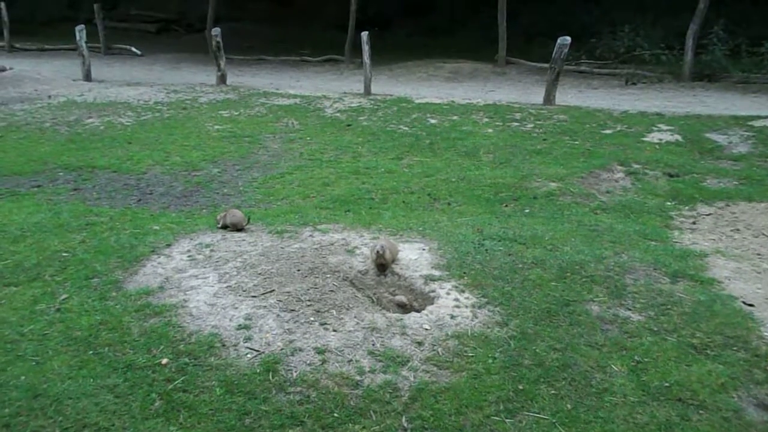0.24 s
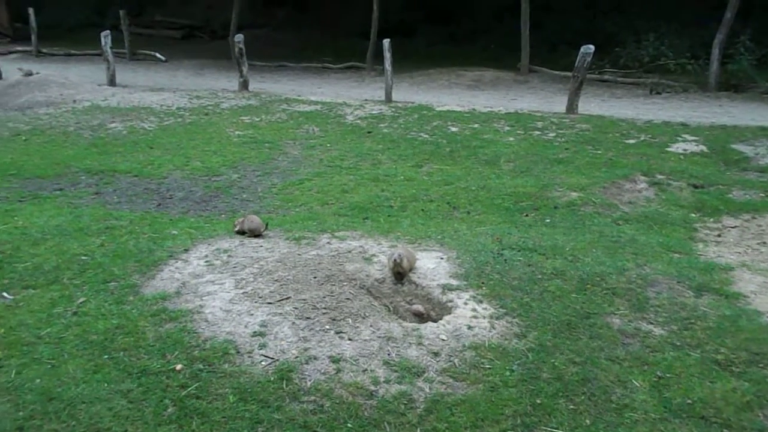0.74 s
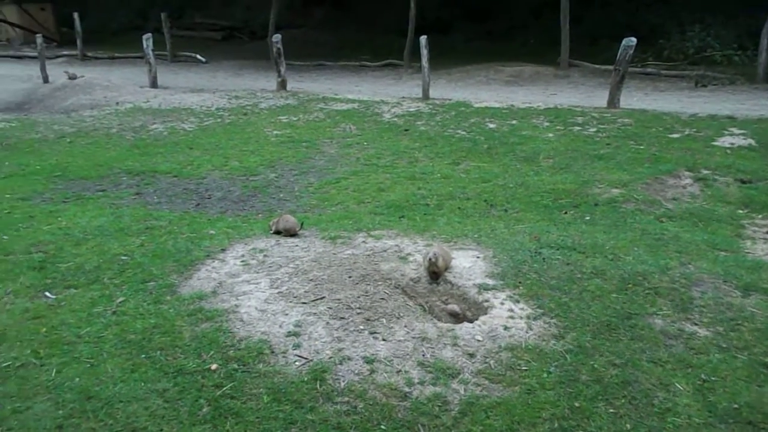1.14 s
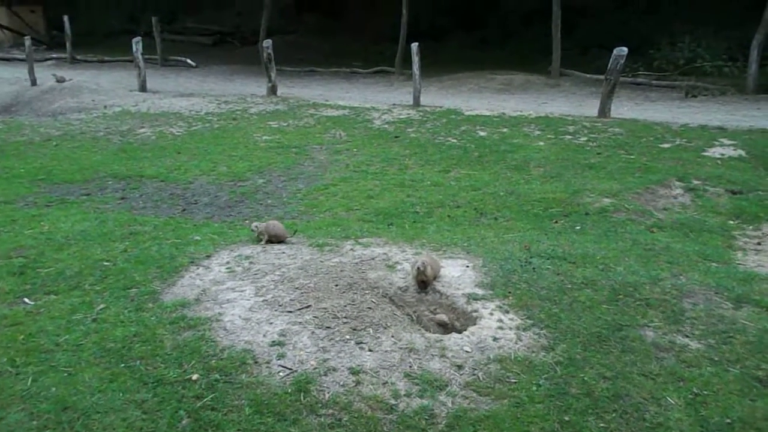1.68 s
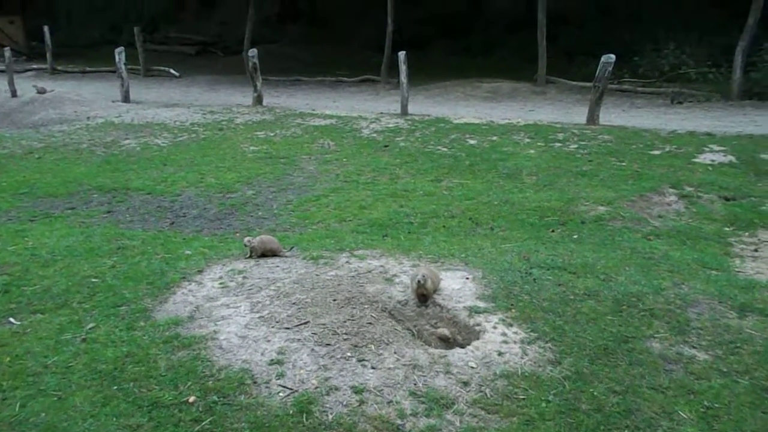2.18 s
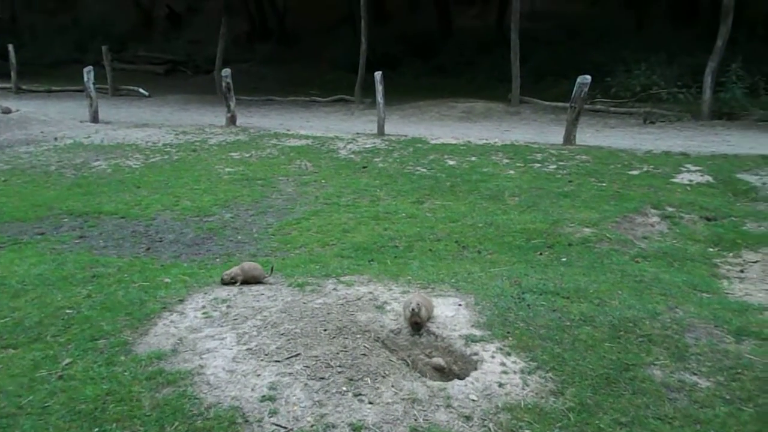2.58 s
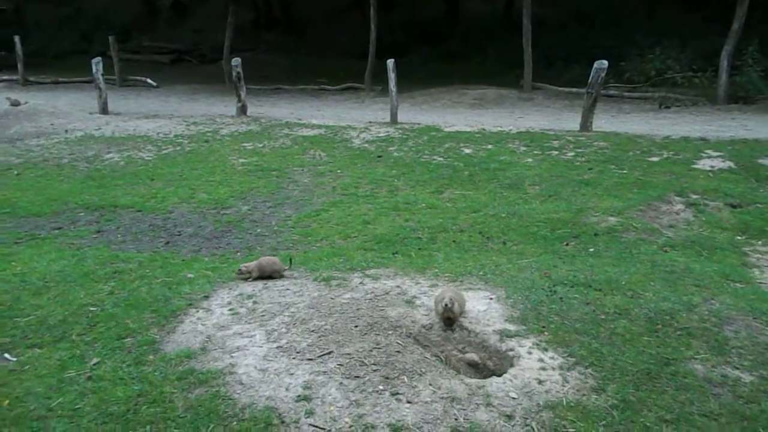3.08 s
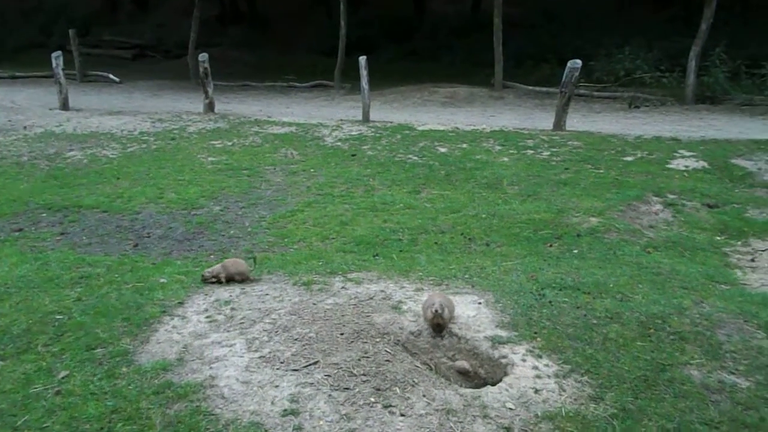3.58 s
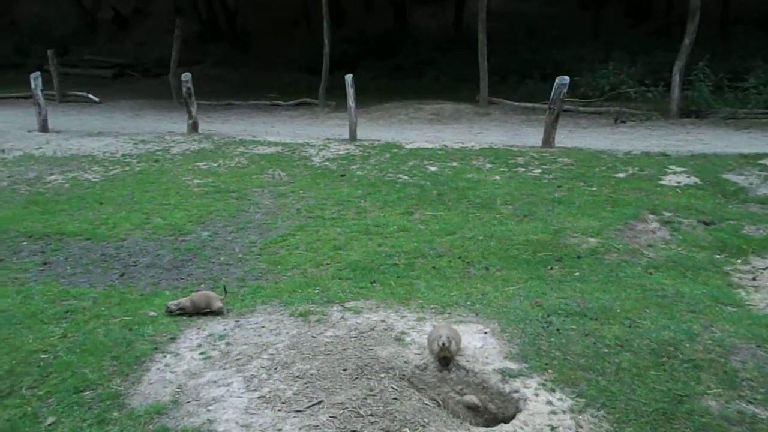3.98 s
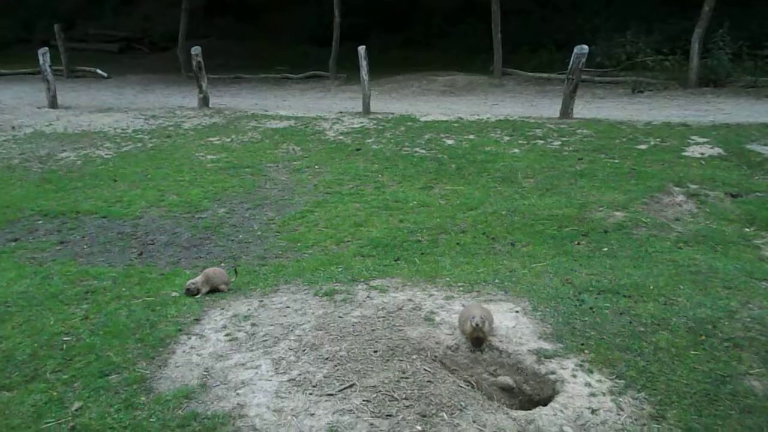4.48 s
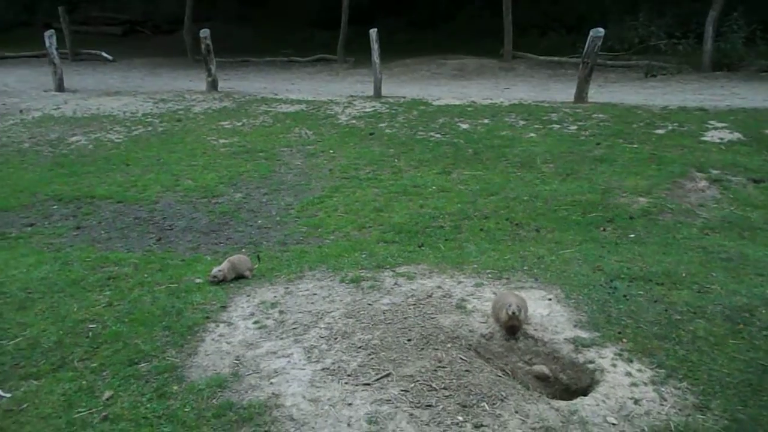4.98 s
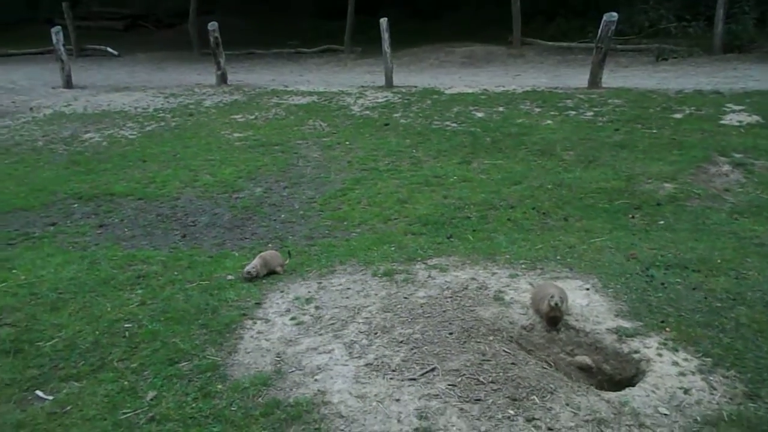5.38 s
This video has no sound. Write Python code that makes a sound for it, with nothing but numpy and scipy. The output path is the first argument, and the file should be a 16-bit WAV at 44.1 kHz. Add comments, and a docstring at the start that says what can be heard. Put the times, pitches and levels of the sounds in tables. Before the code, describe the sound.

A soft hiss of leaves and a low rumble of distant traffic run throughout, in an outdoor enclosure ringed by trees. At the very start, the faint echo of an earlier bark dies away. A prairie dog barks at about 0.8, 1.8 and 3.5 seconds. Each bark is a very short, high, two-part squeal that stands well above the background and leaves a light echo. Fingers knock and tick on the camera right at the microphone, hardest between 1 and 1.3 seconds, then lighter and scattered until near the end. From about 2.9 seconds a distant finch sings a faint run of falling chips, moving into slightly louder chips and hooked whistles around 4 seconds and ending in a falling buzz at about 5 seconds. A sleeve brushes very softly twice near 4.5 seconds.

```python
"""A grass enclosure ringed by trees. Distant traffic rumbles under the hiss of leaves and microphone,
and the trees still echo a prairie dog's earlier bark. It barks at 0.8, 1.8 and 3.5 s, each a two-part
squeal of the vocal folds near 1.8 kHz. Right at the microphone, fingers knock and tick on the camera,
hardest just after the first bark. From 2.9 s a far finch whistles a run of chips, then chips and hooks;
a sleeve brushes close by, and the finch ends on a falling buzz at 5 s."""
import sys
import numpy as np
from scipy import signal
from scipy.fft import rfft, irfft, next_fast_len
from scipy.io import wavfile
from scipy.ndimage import uniform_filter1d, map_coordinates

SR = 44100
rng = np.random.default_rng(int(sys.argv[2]) if len(sys.argv) > 2 else 0)


def dump(signal):
    """Clip the signal to [-1, 1] and save it as 16-bit WAV at the path in sys.argv[1]."""
    limited = np.clip(np.atleast_2d(signal).T, -1, 1)
    pcm = np.round(limited * 32767).astype(np.int16)
    wavfile.write(sys.argv[1], SR, pcm)


N = 248327
LEAD = SR // 2  # samples played before time zero

# distant traffic, swelling and easing: t/s, level/dB
TRAFFIC_LEVEL = [(0, -61.5), (.7, -61.5), (1.1, -60), (1.5, -62.5), (1.9, -60), (2.8, -61.5), (3.1, -59),
                 (3.4, -62), (4.4, -60), (5.1, -62.5), (5.63, -60)]
# spectra of the traffic and of the leaf and microphone hiss: f/Hz, relative level/dB
TRAFFIC_SPECTRUM = [(15, -20), (30, -6), (60, -2), (120, -1.5), (200, -2), (310, -1.5), (500, -5),
                    (900, -14), (1600, -26), (3000, -72)]
HISS_SPECTRUM = [(150, -48), (350, -11), (650, 0), (1100, 0.5), (2000, -1.5), (4000, -1), (6200, 3.5),
                 (7700, -2.5), (9800, 1), (13000, -6)]
# echo of the ring of trees: f/Hz, time to fall 60 dB/s
TREE_DECAY = [(1500, 1.4), (3500, 1.06), (5500, 0.89), (8000, 0.8), (11000, 0.57)]
# trunks and leaves return the treble best: f/Hz, gain/dB
TREE_SCATTER = [(1000, -7), (1800, -6.5), (3500, 0), (5500, -1.5), (9000, -0.5)]
# finch chips, falling: t/s, starting f/Hz, fall/Hz, relative level/dB
FINCH_CHIPS = [(.525, 5900, 695, -58.5), (2.853, 6200, 1100, -61), (2.937, 5600, 640, -64),
               (3.02, 5560, 680, -61), (3.103, 5300, 644, -59), (3.2, 4580, 500, -60),
               (3.286, 4450, 820, -55), (3.371, 4300, 810, -53), (3.453, 4300, 890, -53),
               (3.873, 4300, 1090, -60), (3.949, 4360, 1450, -49.5), (4.03, 4370, 1390, -49),
               (4.151, 4510, 1410, -49.5), (4.276, 4500, 1396, -50.5), (4.404, 4720, 1640, -48),
               (4.53, 4580, 1450, -50), (4.66, 4590, 1750, -52)]
# finch hooks, down then up: lowest point t/s, fall/s, rise/s, relative level/dB
FINCH_HOOKS = [(4.12, .03, .006, -56), (4.247, .036, .015, -55.5), (4.372, .034, .017, -56),
               (4.502, .04, .014, -55), (4.626, .029, .018, -56)]
# finch buzz, lower voice: t/s, f/Hz, relative level/dB, stroke rate/Hz
BUZZ_LOWER = [(4.9, 4840, -80, 182), (4.935, 4330, -54, 168), (5.01, 3700, -54, 92), (5.05, 3084, -53, 70),
              (5.12, 2600, -54.5, 66), (5.175, 2286, -69, 58)]
# finch buzz, upper voice: t/s, f/Hz, relative level/dB
BUZZ_UPPER = [(4.9, 5210, -67), (4.912, 5140, -50), (4.96, 4450, -57), (5.01, 4660, -45), (5.06, 5000, -66),
              (5.1, 5000, -76)]
# a sleeve beside the microphone: t/s, level/dB
SLEEVE_BRUSHES = [(4.465, -59), (4.56, -59.5)]
# fingers on the camera, dull knocks and sharp ticks: t/s, relative level/dB, f/Hz
FINGER_KNOCKS = [(.972, -30.5, 760), (1.026, -30, 704), (1.077, -39, 800), (1.092, -31.5, 830),
                 (1.281, -30.5, 650), (1.787, -32.5, 456), (2.795, -38, 470), (3.106, -39.5, 1100),
                 (4.07, -36, 385), (4.616, -53, 200), (5.275, -43.5, 286), (5.364, -44.5, 366),
                 (5.416, -40.5, 298)]
FINGER_TICKS = [(.558, -46, 5840), (.695, -46, 6070), (1.0406, -33, 9250), (1.078, -26, 8950),
                (1.0936, -14.5, 5300), (1.282, -36, 5866), (1.3138, -35, 5700), (1.6512, -36, 6700),
                (2.3042, -45, 7530), (2.818, -43, 8240)]
# prairie dog's throat, mouth narrow and mouth wide: f/Hz, gain/dB
THROAT_NARROW = [(1400, -34), (1900, -8), (3000, -11.5), (3800, -2), (5700, -3), (7600, -18), (9500, -23.5),
                 (11400, -37)]
THROAT_WIDE = [(1400, -21), (1750, -2), (3000, 12.5), (3500, -1.5), (5250, -0.5), (7000, 0.5), (8800, -14),
               (10500, -30)]
# barks at the vocal folds: t/s, attack/s, upward scoop/Hz;
# high first part: length/s, f/Hz, level/dB, flutter/0-1; break, below the second part: sag/Hz, dip/dB;
# lower second part: length/s, f/Hz, level/dB, flutter/0-1
BARK_CALLS = [(0.84, 0.0041, 50, .019, 1931, -15, 0.2, 88.6, 6.5, .04, 1770, -19.5, 0.2),
              (1.7885, 0.0062, 40, 0.015, 1893, -13.5, 0.34, 115, 9, .03, 1774, -19, 0.08),
              (3.5365, .008, 380, 0.01396, 1900, -15.5, 0.25, 24.5, 2, .037, 1813, -16.5, 0.17)]
# microphone response: f/Hz, gain/dB
MIC_RESPONSE = [(20, -10.5), (150, 0), (400, 1), (9800, 1), (10800, -3), (11600, -11), (12400, -22)]


def amp(db):
    return 10 ** (np.asarray(db) / 20)


def unit(x):
    return x / np.sqrt(np.mean(x ** 2) + 1e-20)


def along(points, hz):
    """Read (f/Hz, value) points on a log frequency axis."""
    f, v = np.transpose(points)
    return np.interp(np.log(hz + 1), np.log(f + 1), v)


def span(rows):
    """First sample, then one value per sample for each column after the time."""
    s, *cols = np.transpose(rows)
    t = np.arange(s[0], s[-1], 1 / SR)
    return round(s[0] * SR), *[np.interp(t, s, c) for c in cols]


def add(track, start, sound):
    track[LEAD + start:][:len(sound)] += sound


def wobble(rate, size):
    """A smooth random curve, rate knots a second."""
    return map_coordinates(rng.standard_normal(int(size * rate / SR) + 4), [np.arange(size) * rate / SR])


def phase(hz):
    return 2 * np.pi * np.cumsum(hz) / SR


def filtered(x, response):
    m = next_fast_len(x.shape[-1] + SR // 4)
    return irfft(rfft(x, m) * response(np.fft.rfftfreq(m, 1 / SR)), m)[..., :x.shape[-1]]


def rush(spectrum, patchy_db=0):
    """Shaped noise of rms 1 with patches of random gain."""
    z = signal.stft(rng.standard_normal(N + 512), nperseg=512)[2]
    patches = uniform_filter1d(uniform_filter1d(rng.standard_normal(z.shape), 6, 0), 14, 1)
    noise = signal.istft(z * amp(patchy_db * unit(patches)), nperseg=512)[1][:N]
    return unit(filtered(noise, lambda hz: amp(along(spectrum, hz))))


def traffic():
    """Far beyond the enclosure, traffic rumbles in slow lumps."""
    db = np.interp(np.arange(N) / SR, *np.transpose(TRAFFIC_LEVEL))
    return amp(db + 0.14 * wobble(4.7, N)) * rush(TRAFFIC_SPECTRUM, patchy_db=1.53)


def hiss(db=-54.5):
    """Leaves all round and the microphone's own noise: one smooth, gently wavering hiss."""
    return amp(db + 0.93 * wobble(4.55, N)) * rush(HISS_SPECTRUM)


def trees(x, near_db, far_db):
    """Direct sound, close ground and post echoes, then the trees' long tail, its treble dying first."""
    hz, t, z = signal.stft(rng.standard_normal(3 * SR // 2), SR, nperseg=256)
    tail = signal.istft(z * amp(-60 * t / along(TREE_DECAY, hz)[:, None]), SR, nperseg=256)[1]
    t = np.arange(len(tail)) / SR
    tail *= 1 - np.exp(-t / 0.027)
    near = rng.standard_normal(len(t)) * amp(-60 * t / 0.42) * (t > .002)
    answer = amp(far_db) * tail / np.linalg.norm(tail) + amp(near_db) * near / np.linalg.norm(near)
    echoes = signal.fftconvolve(x, answer)[:len(x)]
    return x + filtered(echoes, lambda hz: amp(along(TREE_SCATTER, hz)))


def finch_whistles(chip_s=0.01654, hook_top_hz=3700, hook_low_hz=2130):
    """Far off, pure gliding whistles that swell and fade."""
    track = np.zeros(LEAD + N)
    notes = [(s, db, .8, np.linspace(top, top - fall, round(chip_s * SR)))
             for s, top, fall, db in FINCH_CHIPS]
    for s, fall, rise, db in FINCH_HOOKS:
        t = np.arange(-fall, rise, 1 / SR)
        down = (hook_top_hz - hook_low_hz) * np.abs(t / fall) ** 1.5
        up = 3.6e6 * t ** 2
        notes.append((s - fall, db, .25, hook_low_hz + np.where(t < 0, down, up)))
    for s, db, swell, hz in notes:
        add(track, round(s * SR), amp(db + 7) * np.hanning(len(hz)) ** swell * np.sin(phase(hz)))
    return track


def finch_buzz(widest_hz=1400, hz_per_db=40, grow_s=0.049):
    """The same far bird: downward strokes, narrower at first and when soft, under a second voice."""
    track = np.zeros(LEAD + N)
    start, hz, db, rate = span(BUZZ_LOWER)
    grow = np.clip(np.arange(len(hz)) / SR / grow_s, .2, 1)
    width = grow * np.clip(widest_hz + hz_per_db * (db - db.max()), 100, None)
    stroke = np.cumsum(rate * (1 + 0.112 * wobble(40.2, len(rate)))) / SR % 1
    gate = np.sin(np.pi * stroke) ** 2
    add(track, start, amp(db + 8) * gate * np.sin(phase(hz + width * (.5 - stroke))))
    start, hz, db = span(BUZZ_UPPER)
    upper = np.sin(phase(hz + 170 * wobble(300, len(hz))))
    add(track, start, amp(db - 4.5) * (.5 + gate[:len(hz)]) * upper)
    return track


def sleeve(half_width_s=.035):
    """Cloth brushes twice beside the microphone: soft swells of noise near 1.2 kHz."""
    cloth = rush([(500, -36), (900, -5), (1200, -1), (1700, -10), (2500, -27), (5000, -80)])
    t = np.arange(N) / SR
    return cloth * sum(amp(db) * np.exp(-((t - s) / half_width_s) ** 2) for s, db in SLEEVE_BRUSHES)


def fingers(soft_db=-33):
    """At the microphone, each touch briefly rings the camera's plastic shell and leaves a weak rattle."""
    knocks, ticks = np.zeros((2, LEAD + N))
    t = np.arange(SR // 25) / SR
    for s, db, hz in FINGER_KNOCKS:
        hardness = max(1.03 * (db - soft_db), .1)  # a harder knock has a sharper front
        front = amp(-60 * t / 0.0038) * np.sin(2 * np.pi * 1100 * t) * (1 - np.exp(-t / 0.00035))
        body = amp(-60 * t / (6.5 / hz)) * np.sin(2 * np.pi * hz * t)
        rattle = 0.28 * amp(-60 * t / 0.053) * wobble(1850, len(t))
        add(knocks, round((s + 0.00162) * SR), amp(db - 1) * (hardness * front + body + rattle))
    for s, db, hz in FINGER_TICKS:
        snap = amp(-60 * t / 0.0011) * np.sin(2 * np.pi * hz * t)
        rattle = 0.26 * amp(-60 * t / 0.0037) * wobble(3.4 * hz, len(t))
        add(ticks, round((s + 0.00094) * SR), amp(db + 16) * (snap + rattle) * (1 - np.exp(-t / .0001)))
    # the small shell radiates little bass
    knocks = filtered(knocks, lambda hz: 1 / (1 + (170 / (hz + 1)) ** 4))
    ticks = filtered(ticks, lambda hz: 1 / (1 + (2500 / (hz + 1)) ** 2))
    return (knocks + ticks)[LEAD:]


def bark_shape(s, attack, scoop, len1, hz1, db1, flutter1, sag, dip, len2, hz2, db2, flutter2):
    """Rows of t/s, f/Hz, level/dB, flutter through one bark."""
    top1, top2 = 0.44, 0.604  # share of each part before its peak
    onset_db, break_s = 46, 0.00711
    drop_s, drop_hz, drop_db = 0.012, 462, 48.5
    end_hz, end_db = hz2 - 52.6, db2 - 3
    steps, hz, db, flutter = np.transpose([
        (0, hz1 - scoop, db1 - onset_db, 0),  # attack
        (attack / 3, hz1 - .7 * scoop, db1 - 0.48 * onset_db, 0),
        (attack * 2 / 3, hz1 - 0.2 * scoop, db1 - 6.5, 0.23 * flutter1),
        (top1 * len1, hz1, db1, flutter1),  # first part
        ((1 - top1) * len1, hz1 - 30, db1 - 1.5, 1.3 * flutter1),
        (break_s, hz2 - sag, db2 - dip, 0.77),  # rough break
        (top2 * len2, hz2, db2, flutter2),  # second part
        ((1 - top2) * len2, end_hz, end_db, flutter2),
        (drop_s / 3, end_hz - drop_hz / 4, end_db - drop_db / 4, 0),  # collapse
        (drop_s * 2 / 3, end_hz - drop_hz, end_db - drop_db, 0)])
    return np.transpose([s + np.cumsum(steps), hz, db, flutter])


def bark(row, shut_hz=1862, opening_hz=247):
    """Overtones of the vocal folds through the throat; a slower flutter roughens the upper ones."""
    start, hz, db, flutter = span(bark_shape(*row))
    n = len(hz)
    mouth = np.clip((shut_hz - hz) / opening_hz, 0, 1)  # opens as the pitch sinks
    cycle = phase(hz * (1 + 0.016 * wobble(351.5, n)))
    beat = np.exp(1j * phase(360 * (1 + 0.281 * wobble(161.3, n))))
    voice = np.zeros(n)
    for k in range(1, 7):
        throat = amp((1 - mouth) * along(THROAT_NARROW, k * hz) + mouth * along(THROAT_WIDE, k * hz))
        sway = np.clip(flutter, 0, .6) * min(k - .8, 1.25)
        side_tones = sway * (beat + 0.1 * beat.conj())  # the upper one is the stronger
        hoarse = (0.082 + 0.5 * sway * beat) * (wobble(881, n) + 1j * wobble(907, n))
        breath = 0.12 * (wobble(2600, n) + 1j * wobble(2600, n))  # air noise between the overtones
        modulation = (1 + side_tones + hoarse + breath) / np.sqrt(1 + 1.41 * sway ** 2)
        voice += throat * np.real(modulation * np.exp(1j * (k * cycle - .1 * k * k)))
    return start, amp(db) * voice


def prairie_dog(earlier_s=-0.32, earlier_gain_db=1):
    """Across the grass, three barks and the one before them; so small a throat radiates nothing low."""
    track = np.zeros(LEAD + N)
    for row in BARK_CALLS:
        add(track, *bark(row))
    _, earlier = bark(BARK_CALLS[1])  # over before time zero: only its echo is heard
    add(track, round(earlier_s * SR), amp(earlier_gain_db) * earlier)
    return filtered(track, lambda hz: 1 / (1 + (1450 / (hz + 1)) ** 16))


def scene():
    """One microphone position; the far finch carries more echo than the prairie dog."""
    barks = trees(prairie_dog(), near_db=-7.5, far_db=-10)
    song = trees(finch_whistles() + finch_buzz(), near_db=-4.5, far_db=-5.5)
    return ((barks + song)[LEAD:] + fingers() + sleeve() + traffic() + hiss())[None]


def record(dry, top_hz=12400):
    """The microphone thins the bass; its port dulls the top and cancels a narrow band near 7.7 kHz."""
    notch = lambda hz: amp(-8 * np.exp(-((hz - 7700) / 140) ** 2))
    return filtered(dry, lambda hz: amp(along(MIC_RESPONSE, hz)) * notch(hz) * (hz < top_hz))


dry = scene()
out = record(dry)
dump(out)
```